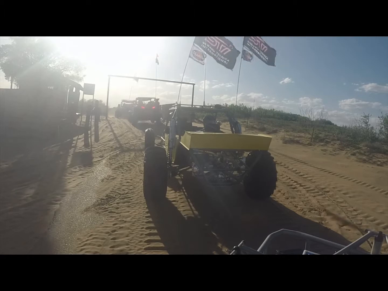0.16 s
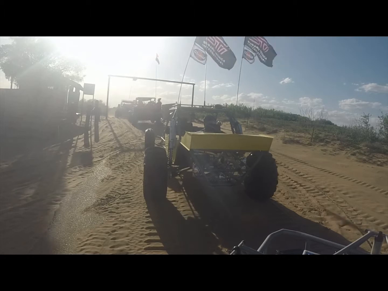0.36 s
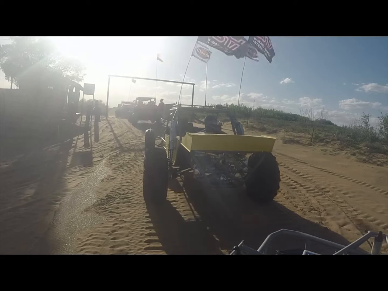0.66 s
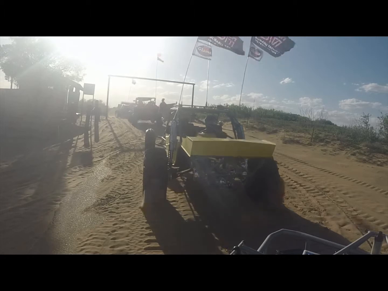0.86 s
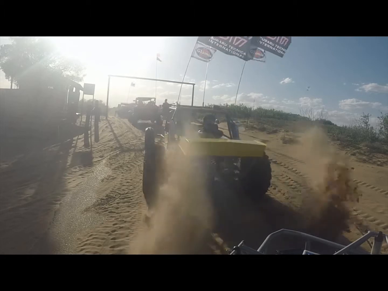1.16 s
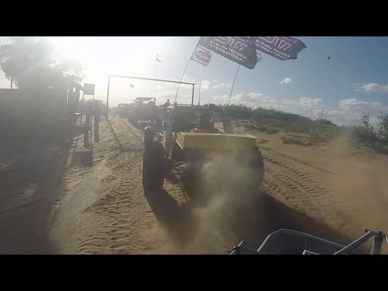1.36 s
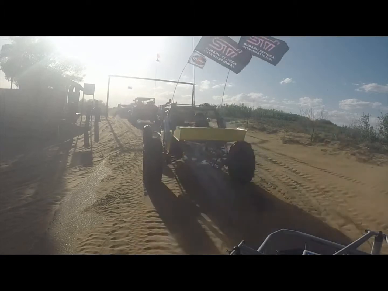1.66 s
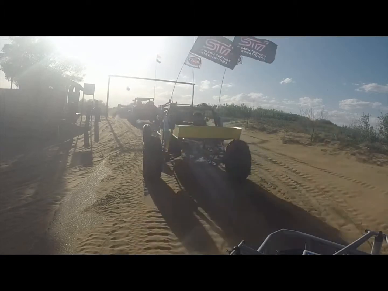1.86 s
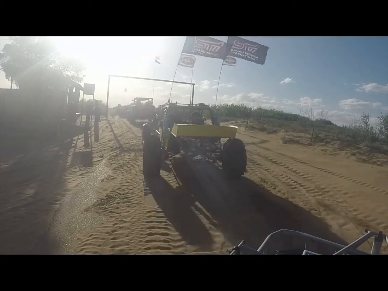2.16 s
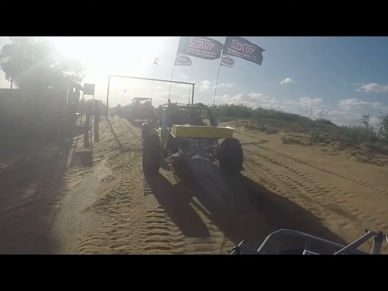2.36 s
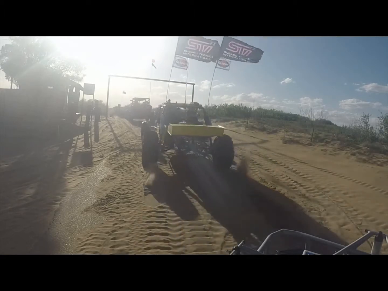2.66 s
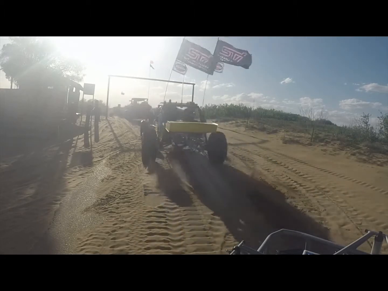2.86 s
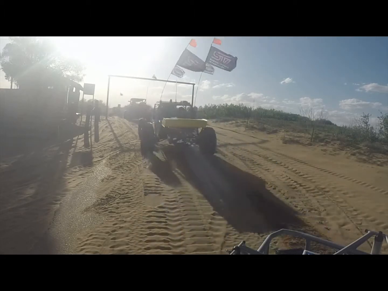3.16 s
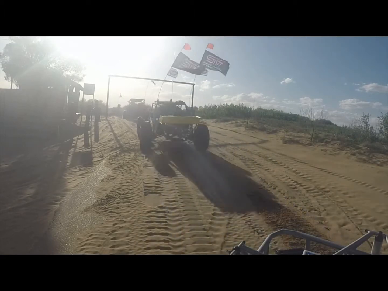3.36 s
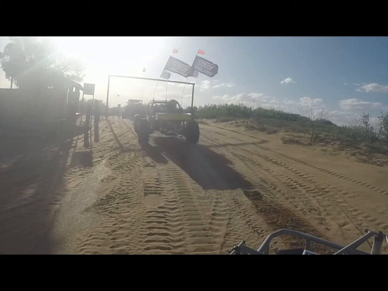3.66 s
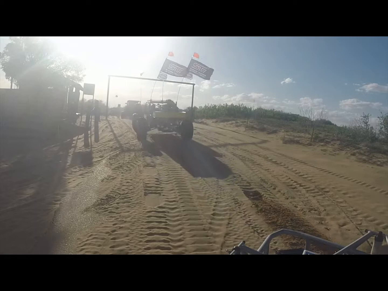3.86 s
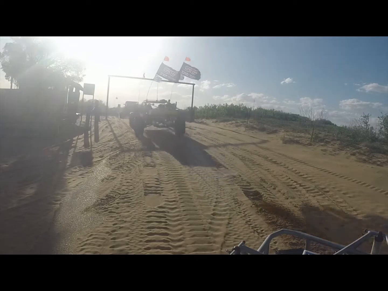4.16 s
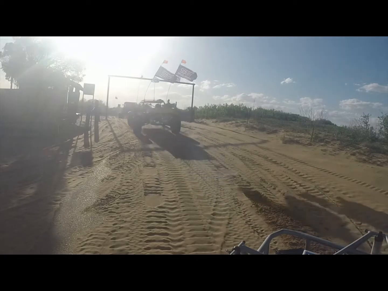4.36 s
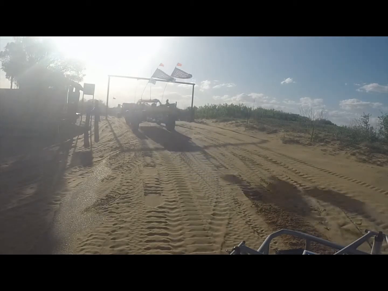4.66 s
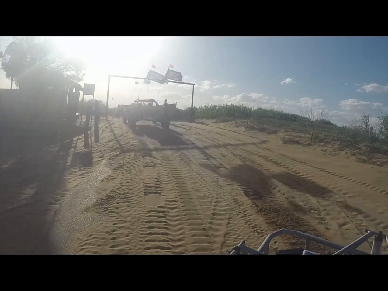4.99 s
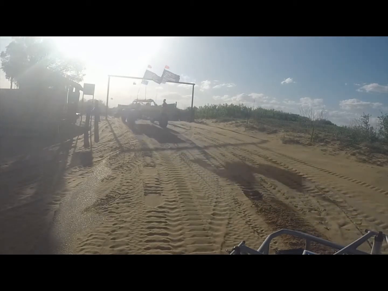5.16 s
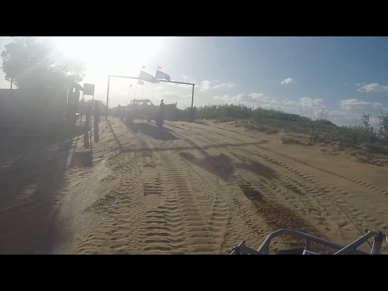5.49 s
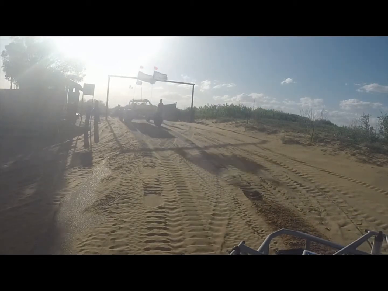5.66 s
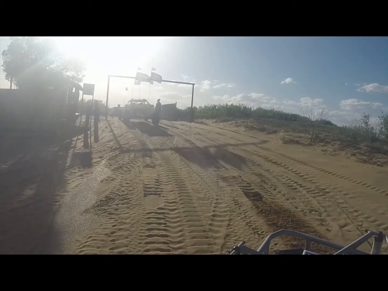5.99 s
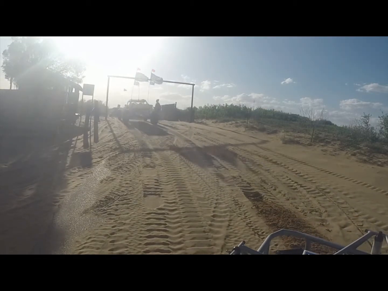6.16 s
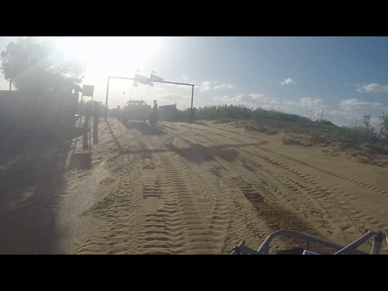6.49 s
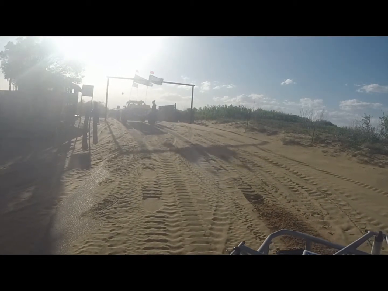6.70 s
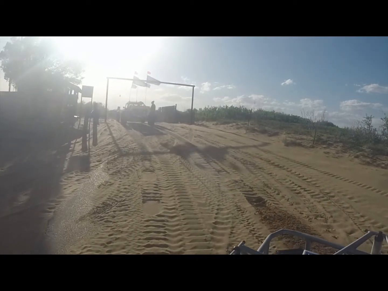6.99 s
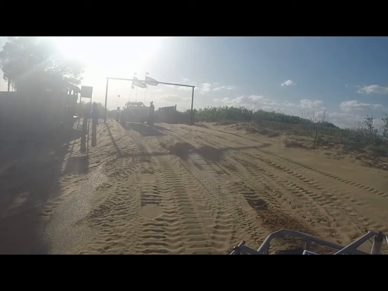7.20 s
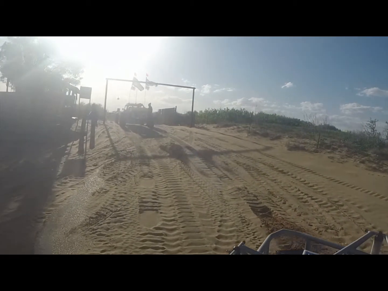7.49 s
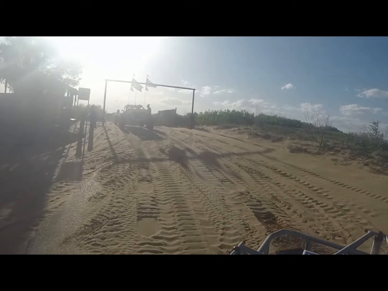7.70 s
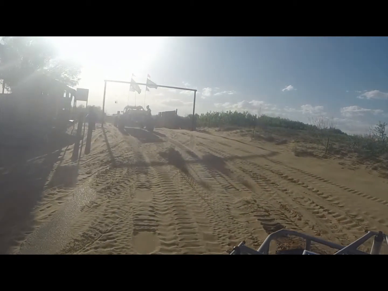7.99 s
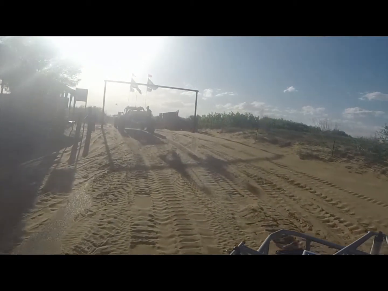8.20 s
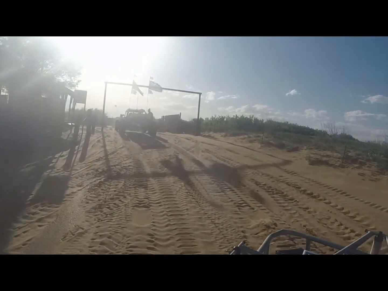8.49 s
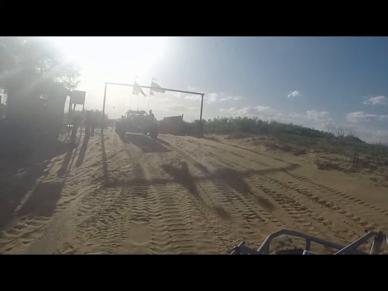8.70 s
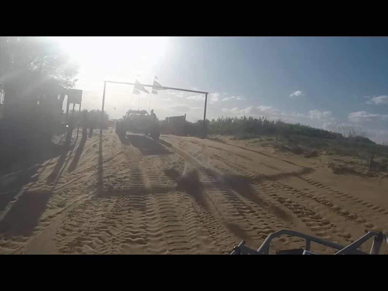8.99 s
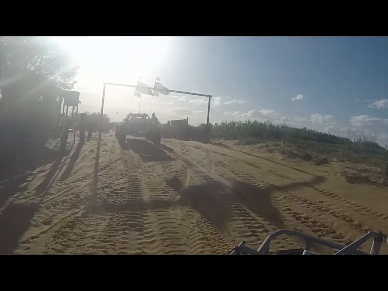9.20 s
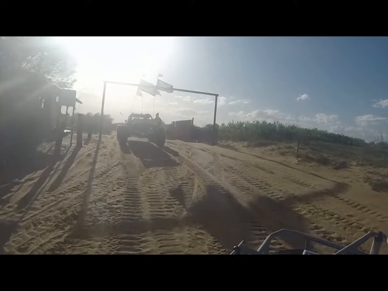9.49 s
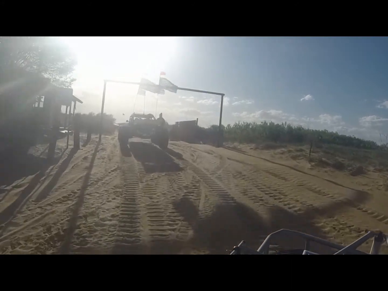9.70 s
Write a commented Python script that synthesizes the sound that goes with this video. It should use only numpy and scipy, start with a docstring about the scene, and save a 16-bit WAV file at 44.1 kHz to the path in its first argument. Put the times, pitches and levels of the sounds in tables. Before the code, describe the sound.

A sand buggy idles lumpily with clattering metal and a steady gear whine, crunches into gear, booms under load and creeps over rutted sand, rattling.

```python
"""Sand buggy idling and pulling

A sand buggy idles with a lumpy exhaust, clattering metal and a steady gear whine, heard from on board.
It crunches into gear, booms under load and creeps over rutted sand, frame rattling; another engine speeds up.
Firing pulses and tones tied to the firing rate make the exhaust and whine; shaped noise makes the gas,
clatter, rattles, knocks and sand; short swinging tones make the bumps."""
import sys
import numpy as np
from scipy import signal
from scipy.fft import rfft, irfft, next_fast_len
from scipy.io import wavfile

SR = 44100
rng = np.random.default_rng(int(sys.argv[2]) if len(sys.argv) > 2 else 0)


def materialize(psi):
    """Save the field psi as 16-bit PCM at rate SR to the path in sys.argv[1].

    A 1-D psi becomes a single channel; in a 2-D psi each row is a channel.
    """
    bounded = np.clip(np.atleast_2d(psi).T, -1, 1)
    quanta = np.round(bounded * 32767).astype(np.int16)
    wavfile.write(sys.argv[1], SR, quanta)


N = 433944
TIME = np.arange(N) / SR   # seconds

# Curves hold their first and last values outside the times listed.
# engine speed, idle with two pushes on the throttle: (time [s], firing rate [firings/s])
ENGINE_SPEED = [(0, 57.2), (1.3, 57.6), (2.2, 58.9), (3.3, 58.7), (4.0, 58), (4.6, 58.4), (4.68, 64.4),
                (4.8, 68.5), (4.91, 71.0), (5.03, 71), (5.2, 68), (5.3, 65.8), (5.44, 64.7), (5.55, 66.6),
                (5.68, 70.6), (5.76, 70.2), (5.9, 66.3), (6.05, 64.9), (6.22, 65.3), (6.5, 66.1),
                (6.75, 65.5), (6.92, 63.8), (7.15, 62), (7.8, 59.5), (9.84, 58.5)]
# how hard the engine pulls: (time [s], load [0-1])
ENGINE_LOAD = [(4.58, 0.02), (4.74, 0.93), (6.85, 0.9), (7.3, 0.53), (8.7, 0.5), (8.95, 0)]
# how strongly the frame shakes and rumbles: (time [s], shake [0-1])
FRAME_SHAKE = [(6.75, 0.44), (7.2, 0.76), (8.3, 0.99), (9.0, 0.85), (9.84, 0.9)]
# how loudly the engine works; the gas gets a fixed lift later: (time [s], gas [dB], metal clatter [dB])
ENGINE_EFFORT = [(0, -31.5, -27.5), (2.64, -31.5, -27.5), (2.92, -36, -27.5), (3.44, -36.5, -28.5),
                 (3.52, -37, -38.5), (3.92, -48, -40.5), (4.02, -38, -35.5), (4.14, -44.5, -35.5),
                 (4.68, -36, -29.5), (4.93, -39, -33), (5.04, -43, -40), (5.2, -43, -36.0),
                 (5.76, -39, -34), (6.0, -41.5, -36), (7.1, -39, -33.5), (7.98, -35, -30),
                 (8.72, -35.5, -33.5), (9.0, -35, -32), (9.82, -38.5, -35)]

# exhaust at the firing rate: (idle level [dB], full-load level [dB], share of clatter's swing followed at idle)
BOOM_VOICE = (-27.5, -14, 1.7)
# exhaust overtones: (idle level [dB], full-load level [dB], share of clatter's swing followed at idle)
BARK_VOICE = (-27.5, -26.5, 0.99)
# uneven firing: (idle level [dB], full-load level [dB], share of clatter's swing followed at idle)
LOPE_VOICE = (-26, -36, 1.2)
# each cylinder's difference from the average push: (push [relative])
CYLINDER_PUSHES = [0.7, -0.12, -0.76]
# how the tailpipe passes the overtones: (frequency [Hz], gain [dB])
TAILPIPE_GAIN = [(110, 7), (135, -1), (145, 2.5), (176, -7.5), (200, -14.5), (215, -14), (229, -8),
                 (236, -17), (250, -17), (263, -12.5), (284, -8.5), (295, -29), (325, -15.5), (355, -15.5),
                 (430, -35.5)]
# the boom sags for a moment: (time [s], depth [dB], half width [s])
BOOM_SAGS = [(5.239, 11, 0.051), (5.669, 8, 0.036), (5.84, 13, 0.037), (6.37, 6, 0.042), (7.31, 17, 0.025),
             (7.56, 22, 0.026)]
BOOM_WAVER_DB = 1.5   # at idle; fades out as load rises
SHAKE_BARK_DB, SHAKE_LOPE_DB = -10.5, 4.5   # change of the exhaust at full shake
GAS_LOAD_BEAT_DB = 1.5   # under load the gas leaves in sharper puffs

# ringing of frame and engine covers: (frequency [Hz], width [Hz], lift [dB])
FRAME_RINGS = [(636.6, 91, 11), (915, 27, 8.5), (1570, 68, 8), (1714, 43, 8.5), (2479, 58, 3),
               (3700, 200, -3.5), (4410, 63, 3), (4596, 70, 4.5), (5540, 160, 5), (6225, 57, 11.5),
               (7530, 280, 10.5), (8360, 190, 14.5)]
# engine covers ring as they shake on their mounts: (frequency [Hz], width [Hz], lift [dB])
COVER_RINGS = [(2643.5, 42, 17), (2820, 45, 8), (3150, 39, 3)]
COVER_WANDER = .0045   # spread of the pitch, as a share of it
# tappet ticks at full shake: level against the clatter, loss on every second tick, ring-out
TICK_DB, TICK_WEAK_DB, TICK_DECAY_S = -13.5, 8, 0.0046

# gear whine against the clatter: (time [s], level [dB])
WHINE_LEVEL = [(0, -9), (1.3, -9), (1.6, -7), (3.41, -1.5), (3.47, -12), (3.7, -10), (3.78, -3), (4.5, -2),
               (4.88, -9), (5.02, -13), (5.2, -5.5), (5.4, -7), (5.62, -14), (5.8, -11.5), (6.2, -13.5),
               (6.45, -13), (6.68, -10), (6.95, -18), (7.3, -17), (9.84, -9)]
# each pair: value at no load, then what full load adds
WHINE_OCTAVE_DB, WHINE_OCTAVE_LOAD_DB = -10.5, 2
WHINE_SMEAR_DB, WHINE_SMEAR_LOAD_DB = -19.5, 17   # smear from play between the teeth
WHINE_WOBBLE, WHINE_WOBBLE_LOAD = .15, .04   # teeth
WHINE_FLUTTER, WHINE_FLUTTER_LOAD = .55, .15   # share 0-1

# gear teeth and frame knocks: (time [s], crunch level [dB], hold [s], thud level [dB])
KNOCK_EVENTS = [(3.439, -16.3, .012, -34), (3.469, -18.5, .011, -30), (3.482, -30, .012, -40),
                (3.499, -21.5, .009, -27), (3.511, -31, .004, -26), (3.581, -28, .008, -31),
                (3.597, -32.5, .009, -24.5), (3.612, -39, .022, -29), (3.999, -31.5, .012, -38),
                (5.318, -39, .03, -31), (5.725, -41, .04, -30), (6.795, -40, .02, -30),
                (6.895, -41, .015, -31), (7.06, -38, .05, -27.5), (7.88, -34, .012, -36),
                (7.985, -35, .012, -31), (8.243, -39, .012, -33), (8.332, -28.5, .008, -24),
                (8.399, -33, .026, -32), (8.858, -38, .025, -27), (9.093, -40, .04, -26)]
KNOCK_RING = 0.054   # share of a knock that goes through the ringing metalwork
# body bumps as the gear goes in and the wheels drop into ruts: (time [s], peak level [dB], frequency [Hz])
BODY_BUMPS = [(3.504, -11.5, 91), (3.595, -24, 85), (3.745, -15.5, 70.6), (7.403, -11, 77.4),
              (7.681, -14, 78.6), (7.98, -24, 72), (8.045, -16, 80), (8.115, -13.5, 100),
              (8.266, -17, 75.5), (8.647, -13, 81.4), (9.103, -15, 103)]
BUMP_RISE_S = .009
# the frame lurches as the drive takes up: (time [s], peak level [dB], hold [s])
FRAME_LURCHES = [(3.53, -28.5, 0.19), (4.74, -35.5, .15), (7.07, -26, 0.073)]
LURCH_RISE_DB_PER_S, LURCH_FALL_DB_PER_S = 129, 52
# frame rumble at shake 0 and shake 1, and its unevenness
LEAST_RUMBLE_DB, MOST_RUMBLE_DB, UNEVEN_DB, UNEVEN_PER_S = -42, -20.5, 1, 9
# the tyres scuff through loose sand: (time [s], peak level [dB], hold [s])
TYRE_SCUFFS = [(7.13, -49, 0.028), (7.195, -45, .04), (7.265, -51, 0.019), (7.43, -47, 0.063),
               (7.61, -43.5, 0.037), (7.965, -55, 0.025), (8.235, -48, 0.025), (8.40, -58, 0.017),
               (8.69, -46, 0.026)]
SCUFF_RISE_DB_PER_S, SCUFF_FALL_DB_PER_S = 700, 304
GRIT_DB, GRIT_PATCHY_DB, GRIT_PER_S = -69, 6.5, 10   # sand hiss at full shake and how it comes and goes

# a brief squeal: (time [s], frequency [Hz], level [dB])
SQUEAL_PITCH = [(2.6, 1280, -82), (2.67, 1284, -36), (2.82, 1332, -41), (2.88, 1320, -79)]
# spurts of airy hiss: (time [s], peak level [dB], hold [s])
HISS_SPURTS = [(.47, -32.5, 0.09), (.79, -41.5, 0.059), (1.77, -45.5, 0.042), (2.3, -46.5, 0.034),
               (3.0, -51, 0.2)]
SPURT_RISE_DB_PER_S, SPURT_FALL_DB_PER_S = 215, 58
# the other engine's speed: (time [s], firing rate [firings/s])
OTHER_ENGINE_SPEED = [(8.7, 86), (8.95, 92), (9.1, 99), (9.35, 104), (9.6, 106), (9.84, 106.5)]
# the other engine's loudness, before each partial's own level: (time [s], level [dB])
OTHER_ENGINE_LEVEL = [(8.6, -100), (8.72, -26.5), (8.95, -29), (9.1, -24.5), (9.35, -24.5), (9.6, -24),
                      (9.84, -26)]
# the other engine's partials: (multiple of the firing rate, level [dB])
OTHER_PARTIALS = [(1, 1), (1.8, -13.5), (2.2, -11), (3.1, -14), (10, -24.5), (12.5, -21.5), (14.5, -21.5)]

# Sound colours; only their shape counts, the loudness is set elsewhere.
# exhaust pipe, uneven firing: (frequency [Hz], level [dB per Hz])
PIPE_COLOUR = [(30, -51), (50, -28.5), (58, 0.5), (69, 0.5), (79, 2.5), (87, -3.5), (97, 9), (112, 2.5),
               (123, -18.5), (136, -6), (155, -8), (200, -24.5), (320, -22.5), (600, -65.5), (3000, -100)]
# rushing exhaust gas: (frequency [Hz], level [dB per Hz])
GAS_COLOUR = [(90, -15.5), (160, 6), (240, -2.5), (345, 0.5), (450, -5.5), (780, -4), (1000, -10),
              (1300, -11.5), (2500, -55)]
# clattering metal: (frequency [Hz], level [dB per Hz])
METAL_COLOUR = [(700, -55), (1100, -17.5), (1330, -2.5), (1800, -3.5), (2060, -4.5), (2290, 5), (2950, -2),
                (3700, -12), (4500, -5.5), (5050, -19), (6100, -18.5), (6800, -24.5), (8500, -40),
                (11500, -43.5)]
# tappet tick: (frequency [Hz], level [dB per Hz])
TICK_COLOUR = [(900, -26.5), (1900, 4.5), (2900, -1), (3600, -6), (4450, 3.5), (5300, -10), (6400, -12),
               (8000, -26), (11500, -37.5)]
# crunching teeth and rattling parts: (frequency [Hz], level [dB per Hz])
CRUNCH_COLOUR = [(200, -12), (450, -11.5), (680, 7.5), (1200, -8), (1600, 3), (2050, -6.5), (2450, 2),
                 (2720, 17.5), (3050, -0.5), (3700, -6.5), (4600, 0.5), (5200, -8.5), (6200, -10.5),
                 (7500, -21), (11500, -43.5)]
# thump of the frame: (frequency [Hz], level [dB per Hz])
THUD_COLOUR = [(30, -32), (48, -12), (78, 16), (130, -8), (300, 0.5), (600, -9.5), (1000, -16), (1700, -13),
               (2600, -22), (5000, -60)]
# frame rumble: (frequency [Hz], level [dB per Hz])
RUMBLE_COLOUR = [(8, -48), (20, -21.5), (40, -10), (50, -18.5), (62, 0.5), (80, 11.5), (100, -9.5),
                 (125, -7.5), (170, -17), (320, -17.5), (480, -44), (900, -49), (5000, -62.5), (12000, -87)]
# sand under the tyres: (frequency [Hz], level [dB per Hz])
GRIT_COLOUR = [(2000, -18), (4400, 4.5), (6500, -12.5), (8000, -14.5), (11500, -31.5)]
# airy hiss: (frequency [Hz], level [dB per Hz])
AIR_COLOUR = [(3000, 0.5), (5200, 9), (6600, -4.5), (7300, 9.5), (8100, -12), (8900, -3), (10200, 2),
              (11000, -19), (12000, 4)]
CUTOFF_HZ = 11700


def from_db(db):
    """Turn decibels into a gain."""
    return 10 ** (np.asarray(db) / 20)


def rms_one(x):
    """Scale a sound to unit power."""
    return x / np.sqrt(np.mean(x ** 2) + 1e-20)


def in_time(rows):
    """Read each column of a curve at every sample."""
    s, *columns = np.transpose(rows)
    return [np.interp(TIME, s, c) for c in columns]


def drift(rate):
    """Smooth random wandering of spread 1, changing about rate times a second."""
    step = 40   # samples between the slow values
    r = np.exp(-2 * step * np.pi * rate / SR)
    kicks = rng.standard_normal(N // step + 2002)
    slow = signal.lfilter([1], [1, -2 * r, r * r], kicks)[2000:]   # drop the run-in
    return np.interp(np.arange(N) / step, np.arange(len(slow)), rms_one(slow))


def colour(x, spectrum):
    """Give a sound a smooth spectral shape that rings after its cause, never before."""
    size = 2 * next_fast_len(N // 2 + SR // 8, True)
    hz, db = np.transpose(spectrum)
    bins = np.maximum(np.arange(size // 2 + 1) * SR / size, 1)
    # folding the cepstrum puts all the ringing after the cause
    cepstrum = irfft(np.log(from_db(np.interp(np.log(bins), np.log(hz), db))))
    causal = np.r_[cepstrum[0], 2 * cepstrum[1:size // 2]]
    return irfft(rfft(x, size) * np.exp(rfft(causal, size)), size)[:N]


def wash(spectrum):
    """Smooth noise of unit power with the given colour."""
    return rms_one(colour(rng.standard_normal(N), spectrum))


def tone(cycles, rough, flutter_hz):
    """A tone of unit power; rough is the share of its power that flutters at random."""
    rough = np.clip(rough, 0, 1)
    angle = 2 * np.pi * cycles
    flutter = drift(flutter_hz) * np.sin(angle) + drift(flutter_hz) * np.cos(angle)
    return np.sqrt(2 * (1 - rough)) * np.sin(angle) + np.sqrt(rough) * flutter


def swells(rows, rise_db_per_s, fall_db_per_s):
    """Gain of events that rise, hold and die away."""
    gain = 0
    for s, db, hold in rows:
        before = np.maximum(s - TIME, 0)
        after = np.maximum(TIME - s - hold, 0)
        gain = gain + from_db(db - rise_db_per_s * before - fall_db_per_s * after)
    return gain


def strikes(x, decay_s):
    """Each single-sample hit becomes a strength that starts at once and dies away."""
    return signal.lfilter([1], [1, -np.exp(-1 / (decay_s * SR))], x + 1e-18)


def rattle(per_s, spread_db, decay_s):
    """Loose parts tap at random; each tap starts at once and dies quickly."""
    at = np.flatnonzero(rng.random(N) < per_s / SR)
    taps = np.zeros(N)
    taps[at] = from_db(spread_db * rng.uniform(-1.6, 1, len(at)))
    return rms_one(strikes(taps, decay_s) * rng.standard_normal(N))


def frame(x):
    """The metalwork rings along with whatever shakes it."""
    out = x
    for hz, width, lift_db in FRAME_RINGS:
        r = np.exp(-np.pi * width / SR)
        ring = signal.lfilter([1, 0, -1], [1, -2 * r * np.cos(2 * np.pi * hz / SR), r * r], x + 1e-18)
        out = out + (from_db(lift_db) - 1) * (1 - r * r) / 2 * ring
    return out


def voice_db(voice, load, effort_db):
    """An exhaust voice follows the effort at idle and moves to its loaded level as the engine pulls."""
    idle_db, loaded_db, follows = voice
    return (1 - load) * (idle_db + follows * effort_db) + load * loaded_db


def exhaust_note(firings, firing_hz, boom_db, bark_db, count=6):
    """The even part of the firings: a tone at the firing rate and overtones weighted by the tailpipe."""
    note = from_db(boom_db) * tone(firings, rough=0.0076, flutter_hz=6.5)
    bark = from_db(bark_db)
    for k in range(2, count + 1):
        pipe_db = np.interp(k * firing_hz, *np.transpose(TAILPIPE_GAIN))
        overtone = tone(k * firings, rough=.012 * k * k, flutter_hz=9)
        note = note + bark * from_db(pipe_db) * overtone
    return note


def exhaust_lope(firings):
    """Three cylinders push unequally, and now and then one fires much harder."""
    at = np.flatnonzero(np.diff(np.floor(firings)))
    pushes = np.zeros(N)
    luck = np.minimum(rng.exponential(1, len(at)), 3) - 1
    pushes[at] = np.resize(CYLINDER_PUSHES, len(at)) + luck
    # turbulent gas fills the pipe between the pushes
    turbulence = from_db(-14) * rng.standard_normal(N)
    return rms_one(colour(rms_one(pushes) + turbulence, PIPE_COLOUR))


def exhaust(firings, firing_hz, load, effort_db, shake):
    """Lumpy at idle; under load the firings even out into a boom that sags now and then."""
    sag_db = sum(depth * np.exp(-((TIME - s) / width) ** 2) for s, depth, width in BOOM_SAGS)
    waver_db = BOOM_WAVER_DB * (1 - load) * drift(3.2)
    boom_db = voice_db(BOOM_VOICE, load, effort_db) + waver_db - sag_db
    bark_db = voice_db(BARK_VOICE, load, effort_db) + SHAKE_BARK_DB * shake - 0.93 * sag_db
    lope_db = voice_db(LOPE_VOICE, load, effort_db) + SHAKE_LOPE_DB * shake - 0.3 * sag_db
    note = exhaust_note(firings, firing_hz, boom_db, bark_db)
    return note + from_db(lope_db) * exhaust_lope(firings)


def chuff(firings, beat_db, flicker_db, flicker_hz):
    """Noise that can surge with each firing and flickers unevenly."""
    stroke = np.exp(-4 * (firings % 1))
    level_db = beat_db * (stroke - stroke.mean()) + flicker_db * drift(flicker_hz)
    return rng.standard_normal(N) * from_db(level_db)


def exhaust_gas(firings, load, gas_db):
    """Gas rushes out in puffs, one for each firing, and the metalwork rings with it."""
    puffs = chuff(firings, beat_db=2.5 + GAS_LOAD_BEAT_DB * load, flicker_db=1.0, flicker_hz=29.6)
    return from_db(gas_db + 2.0) * rms_one(frame(colour(puffs, GAS_COLOUR)))


def covers(x, wander_hz=14, size=256):
    """Loose covers ring at pitches that wander a little."""
    out = x.copy()
    for hz, width, lift_db in COVER_RINGS:
        r = np.exp(-np.pi * width / SR)
        pitches = hz * (1 + COVER_WANDER * drift(wander_hz)[::size])
        cosines = np.cos(2 * np.pi * pitches / SR)
        gain = (from_db(lift_db) - 1) * (1 - r * r) / 2
        state = np.zeros(2)   # carries the ringing from block to block
        for i, c in zip(range(0, N, size), cosines):
            block = x[i:i + size]
            ring, state = signal.lfilter([gain, 0, -gain], [1, -2 * r * c, r * r], block, zi=state)
            out[i:i + size] += ring
    return out


def tappets(firings, spread_db=5.0):
    """A sharp tick of noise with each firing, strong and weak in turn with random spread; unit power."""
    at = np.flatnonzero(np.diff(np.floor(firings)))
    ticks = np.zeros(N)
    turn_db = np.resize([0, -TICK_WEAK_DB], len(at))
    ticks[at] = from_db(turn_db + spread_db * rng.uniform(-1.2, 1, len(at)))
    return rms_one(strikes(ticks, TICK_DECAY_S) * wash(TICK_COLOUR))


def metal_clatter(firings, clatter_db, shake):
    """Valve gear and loose parts excite the ringing metalwork; tappet ticks grow with the frame's shake."""
    valves = rms_one(chuff(firings, beat_db=0.0, flicker_db=0.94, flicker_hz=35))
    loose = from_db(-7.5) * rattle(per_s=130, spread_db=0, decay_s=0.0023)
    ringing = rms_one(covers(frame(colour(valves + loose, METAL_COLOUR))))
    ticks = from_db(TICK_DB) * shake * tappets(firings)
    return from_db(clatter_db) * (ringing + ticks)


def gear_whine(firings, clatter_db, load, teeth_per_firing=26):
    """A gear driven by the crank sings at its tooth rate; backlash wobbles the pitch, more so under load."""
    wobble = (WHINE_WOBBLE + WHINE_WOBBLE_LOAD * load) * drift(17)
    teeth = teeth_per_firing * firings + wobble
    octave_gain = from_db(WHINE_OCTAVE_DB + WHINE_OCTAVE_LOAD_DB * load)
    octave = octave_gain * tone(2 * teeth, rough=0.95, flutter_hz=90)
    smear = from_db(WHINE_SMEAR_DB + WHINE_SMEAR_LOAD_DB * load)
    line = tone(teeth, rough=WHINE_FLUTTER + WHINE_FLUTTER_LOAD * load, flutter_hz=22.5)
    # sharing the power keeps the smeared line equally loud
    line = (line + smear * tone(teeth, rough=1.0, flutter_hz=80)) / np.hypot(1, smear)
    return from_db(clatter_db + in_time(WHINE_LEVEL)[0]) * (line + octave)


def event_span(s):
    """The fifth of a second from time s, and the age in seconds within it."""
    span = slice(int(s * SR), int(s * SR) + SR // 5)
    return span, TIME[span] - TIME[span][0]


def knocks(ring_s=.0025, thud_s=.016):
    """Each contact grinds for a moment and thumps the frame; the metalwork rings only faintly after it."""
    grind, thump = np.zeros(N), np.zeros(N)
    for s, crunch_db, hold, thud_db in KNOCK_EVENTS:
        span, age = event_span(s)
        released = np.maximum(age - hold, 0)
        bite = 1 - np.exp(-10 * age / ring_s)   # the teeth take a moment to engage
        grind[span] += from_db(crunch_db) * bite * np.exp(-released / ring_s)
        thump[span] += from_db(thud_db) * bite * np.exp(-released / thud_s)
    catches = rms_one(from_db(1.9 * np.tanh(drift(350))))   # the teeth catch and slip
    blows = grind * catches * wash(CRUNCH_COLOUR) + thump * wash(THUD_COLOUR)
    return blows + KNOCK_RING * (frame(blows) - blows)


def bumps():
    """The body swings a few times on its tyres after each jolt: a low tone that swells and dies fast."""
    out = np.zeros(N)
    for s, db, hz in BODY_BUMPS:
        span, age = event_span(s)
        swell = age / BUMP_RISE_S * np.exp(1 - age / BUMP_RISE_S)
        out[span] += from_db(db) * swell * np.sin(2 * np.pi * hz * age)
    return out


def chassis(shake):
    """The frame rumbles and rattles as strongly as it shakes, and more when it lurches."""
    uneven_db = UNEVEN_DB * np.tanh(drift(UNEVEN_PER_S))
    steady = from_db(LEAST_RUMBLE_DB + (MOST_RUMBLE_DB - LEAST_RUMBLE_DB) * shake + uneven_db)
    shaking = np.hypot(steady, swells(FRAME_LURCHES, LURCH_RISE_DB_PER_S, LURCH_FALL_DB_PER_S))
    jolts = rms_one(colour(rattle(per_s=110, spread_db=9.5, decay_s=0.0095), CRUNCH_COLOUR))
    return shaking * (wash(RUMBLE_COLOUR) + from_db(-30.5) * jolts)


def sand(shake):
    """Grainy noise: sand hisses under the tyres, louder as the frame shakes more and in scuffs."""
    grains = rms_one(wash(GRIT_COLOUR) * from_db(5 * np.tanh(drift(150))))
    grit = shake ** 2 * from_db(GRIT_DB + GRIT_PATCHY_DB * np.tanh(drift(GRIT_PER_S)))
    scuffs = swells(TYRE_SCUFFS, SCUFF_RISE_DB_PER_S, SCUFF_FALL_DB_PER_S)
    return np.hypot(grit, scuffs) * grains


def squeal(third_db=-15):
    """A short rubbing tone with a faint third harmonic."""
    hz, db = in_time(SQUEAL_PITCH)
    cycles = np.cumsum(hz) / SR
    third = from_db(third_db) * tone(3 * cycles, rough=0.91, flutter_hz=60)
    return from_db(db) * (tone(cycles, rough=1.0, flutter_hz=40) + third)


def hiss(flicker_db=2.0, flicker_hz=60):
    """Thin, flickering noise comes in airy spurts."""
    air = rms_one(wash(AIR_COLOUR) * from_db(flicker_db * drift(flicker_hz)))
    return swells(HISS_SPURTS, SPURT_RISE_DB_PER_S, SPURT_FALL_DB_PER_S) * air


def other_engine():
    """A second buggy's rough note, a stack of fluttering tones, climbs as it gathers speed."""
    firings = np.cumsum(in_time(OTHER_ENGINE_SPEED)[0]) / SR
    note = 0
    for k, level_db in OTHER_PARTIALS:
        note = note + from_db(level_db) * tone(k * firings, rough=.35 * k, flutter_hz=18 + k)
    return from_db(in_time(OTHER_ENGINE_LEVEL)[0]) * note


def scene():
    """One count of firings drives the buggy's engine sounds; the rest is added around them."""
    firing_hz = in_time(ENGINE_SPEED)[0] * (1 + 0.00307 * drift(6.08))   # slightly unsteady
    firings = np.cumsum(firing_hz) / SR
    load = np.clip(in_time(ENGINE_LOAD)[0], 0, 1)
    shake = np.clip(in_time(FRAME_SHAKE)[0], 0, 1)
    gas_db, clatter_db = in_time(ENGINE_EFFORT)
    effort_db = clatter_db - clatter_db[0]
    engine = exhaust(firings, firing_hz, load, effort_db, shake)
    engine = engine + exhaust_gas(firings, load, gas_db)
    engine = engine + metal_clatter(firings, clatter_db, shake)
    engine = engine + gear_whine(firings, clatter_db, load)
    body = knocks() + bumps() + chassis(shake) + sand(shake)
    return (engine + body + squeal() + hiss() + other_engine())[None]


def record(dry):
    """A steep low-pass filter takes away the top above CUTOFF_HZ."""
    return signal.sosfilt(signal.ellip(14, .1, 90, CUTOFF_HZ, fs=SR, output="sos"), dry)


dry = scene()
out = record(dry)
materialize(out)
```